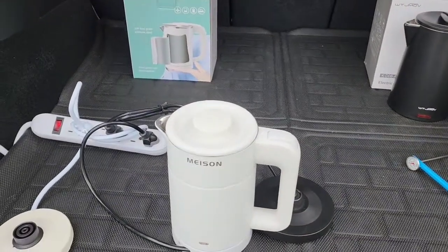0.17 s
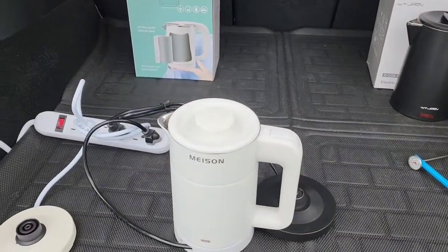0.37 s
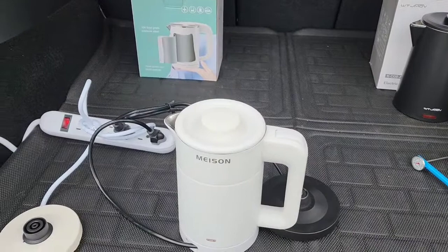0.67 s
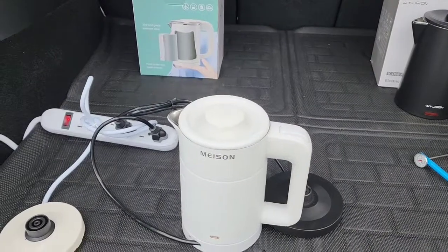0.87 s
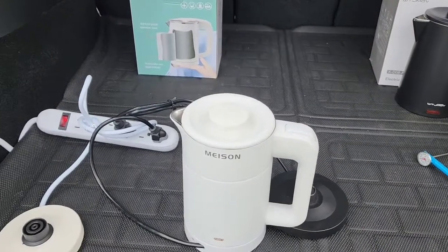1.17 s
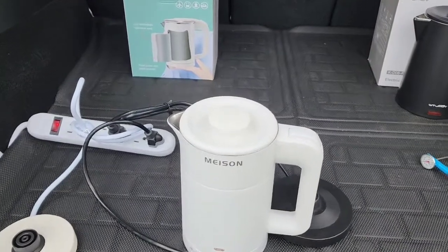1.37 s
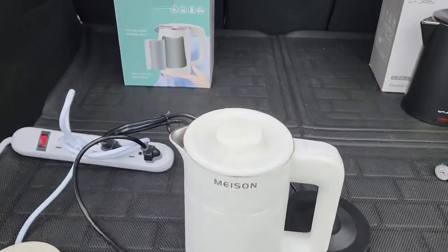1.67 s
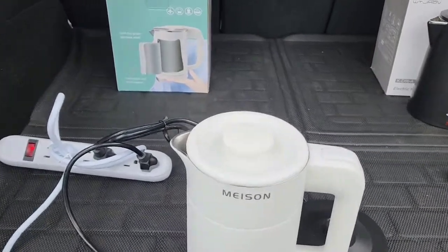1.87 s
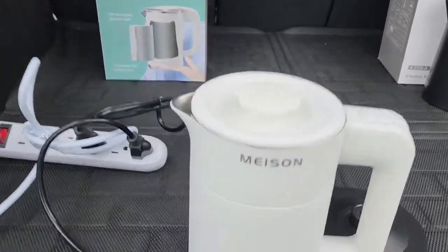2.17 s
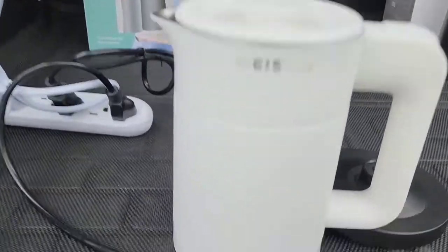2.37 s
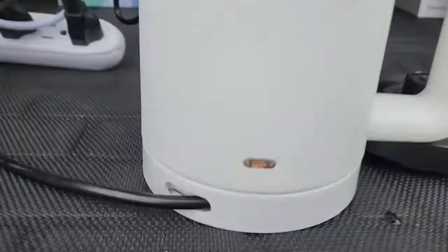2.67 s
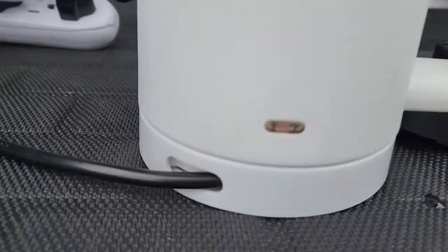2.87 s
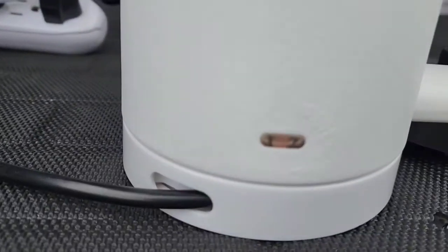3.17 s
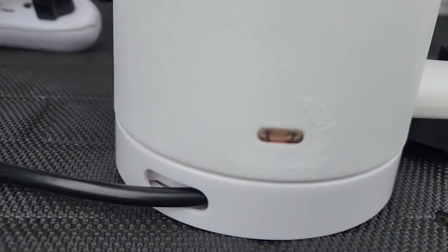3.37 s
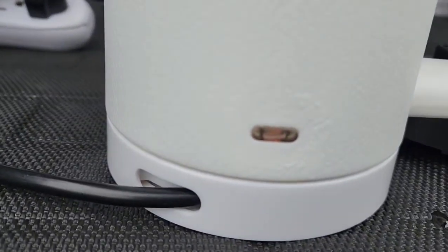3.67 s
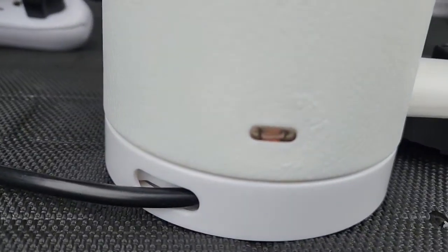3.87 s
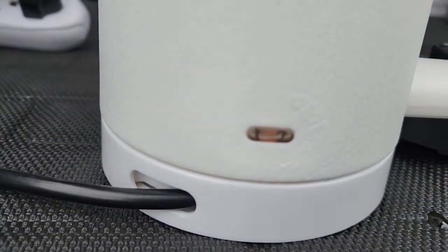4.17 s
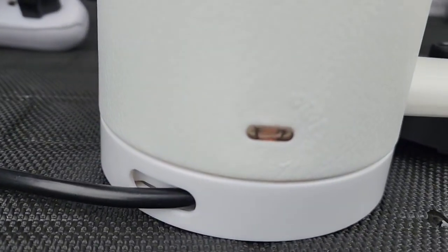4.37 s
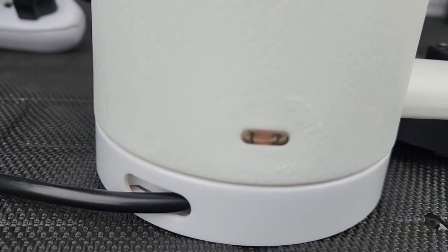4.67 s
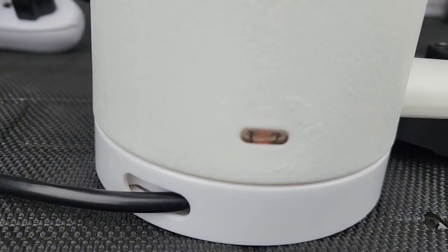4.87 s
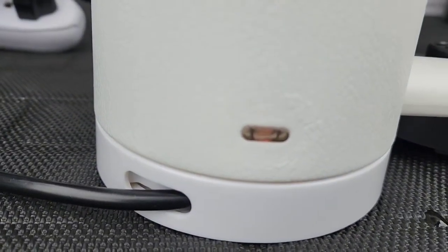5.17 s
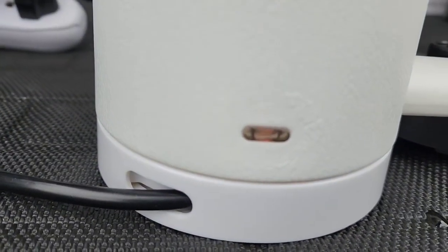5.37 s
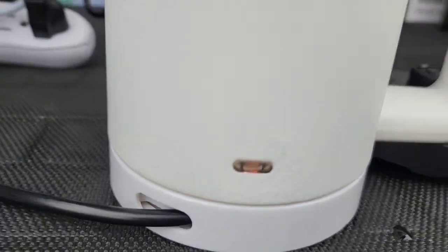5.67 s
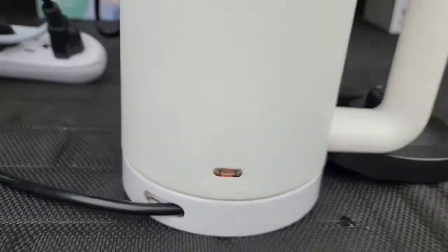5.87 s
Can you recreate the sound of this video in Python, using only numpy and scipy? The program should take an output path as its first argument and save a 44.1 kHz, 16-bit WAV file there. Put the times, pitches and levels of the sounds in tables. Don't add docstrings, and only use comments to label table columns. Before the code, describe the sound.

From the start, deep traffic and machinery boom fills an open vehicle boot, surging unevenly with soft dull thuds, under a broad outdoor wash. A far motor whines at a mid pitch with rough overlapping howls, loudest in the first half second, then biting in weaker spurts until about 2.6 s. At 0.55-0.8 s a distant brake gives one thin, fluttering, very high squeal. The kettle's simmer is faint at first. Around 2.1-2.7 s a sleeve rustles with a quick jerk and tiny crisp snaps, mainly left, as the phone moves in. From 2.7 to 5.5 s the simmer is close: a dense, low-mid bubbling roar, steady, with the yard dimmed and a faint motor whine at 3 s and from 4 to 5.3 s. Near 5.6-6 s faint cloth ticks accompany the retreat and the simmer softens. Light microphone hiss persists, stronger on the left.

```python
import sys
import numpy as np
from scipy import signal
from scipy.fft import rfft, irfft, next_fast_len
from scipy.io import wavfile
from scipy.ndimage import uniform_filter1d, map_coordinates

SR = 44100
rng = np.random.default_rng(int(sys.argv[2]) if len(sys.argv) > 2 else 0)


def boost_factor(decibels):
    exponent = np.asarray(decibels, float) / 20
    return 10 ** exponent


def transcribe(signal):
    frames = np.atleast_2d(signal).T
    limited = np.clip(frames, -1, 1)
    pcm = np.round(limited * 32767).astype(np.int16)
    wavfile.write(sys.argv[1], SR, pcm)


N = 265437

# pitch_hz, level_db (per Hz)
SIMMER_COLOUR = [(180, -17.5), (300, 1), (398, -5), (474, -6), (660, -6.5), (919, -10.5), (1080, -14),
                 (1670, -11), (2520, -28.5), (3190, -27.5), (3510, -37), (4310, -36), (4810, -56),
                 (6100, -51), (13000, -70.5)]
# pitch_hz, width_hz, gain_db
SHELL_MODES = [(700, 85, -4.5), (960, 120, 4), (1086, 110, -4.5), (2920, 69, -8), (3140, 190, 4),
               (4730, 390, -7), (6230, 460, 5), (6860, 240, -7), (7500, 260, 2), (8800, 300, -3),
               (10800, 560, -4.5), (12000, 500, 6.5)]
# pitch_hz, likeness (0-1), left_minus_right_db, left_lead_rad
SIMMER_PORTS = [(300, 0.95, -1.5, 0.5), (600, .84, -3, -0.27), (885, 0.85, -4, 1.07),
                (1150, 0.28, -10.5, -2.5), (1460, .05, -14.5, -0.5), (1900, 0.29, -18.5, -5),
                (2480, .2, -21.5, -2.5), (2800, 0.27, -19.5, -6.5), (2890, 0.4, -15.5, -9.5),
                (3500, 0.21, -11, -9), (3880, .55, -10.5, -15), (4400, .1, -10, -11.5),
                (4900, .1, 16, -11.5), (6200, .2, -2, -11), (8000, 0.35, 1, -11.5)]


def kettle():
    bubbles_per_s, level_at_1m_db = 9000, -56
    chance = bubbles_per_s / SR * boost_factor(1.5 * np.array([wobble(25), wobble(25)]))
    collapses = (rng.random((2, N)) < chance) * rng.standard_normal((2, N))
    water = unit(collapses) + 0.71 * patchy(patchy_db=3.0)
    knocks = ports(filtered(water, bumps(SHELL_MODES)), SIMMER_COLOUR, SIMMER_PORTS)
    return boost_factor(level_at_1m_db + kettle_gain_db() + 0.45 * wobble(5.7)) * knocks


# time_s, distance_m
PHONE_PATH = [
    (0, 0.6),
    (.75, 0.77),
    (1.9, 0.5),
    (2.55, 0.23),
    (2.72, 0.14),
    (3, 0.12),
    (4.3, 0.11),
    (5.5, 0.12),
    (5.75, .14),
    (6.02, .22),
]


def kettle_gain_db():
    metres, = curves(PHONE_PATH)
    return -20 * np.log10(metres)


def door_shade_db():
    full_view_m = 0.4
    return np.maximum(kettle_gain_db() + 20 * np.log10(full_view_m), 0)


# pitch_hz, level_db (per Hz)
CLOTH_COLOUR = [(2000, -26.5), (3400, 2), (4190, -3.5), (5010, -19), (5510, -16.5), (6070, -12),
                (7580, -13.5), (8450, -17), (10600, -11.5), (12600, -11.5), (15600, -17)]
# pitch_hz, likeness (0-1), left_minus_right_db, left_lead_rad
CLOTH_PORTS = [(3500, .1, -10, 0), (5000, .1, 4, 0.014), (8000, .1, 13, 0.0055), (15000, .1, 12.5, 0)]
# start_s, held_s, level_db
STROKES = [
    (2.07, .25, -75),
    (2.334, 0.016, -66),
    (2.36, 0.27, -70),
    (2.99, 0.012, -78.5),
    (5.551, 0.018, -82.5),
    (5.72, .3, -84),
]
# middle_s, peak_db, pitch_hz
FIBRE_SNAPS = [
    (2.3352, -58, 10600),
    (2.4994, -62, 10800),
    (2.5604, -62, 12600),
    (2.9997, -75, 12060),
    (5.5594, -77, 9530),
    (5.7294, -72, 11200),
    (5.8294, -76, 9600),
    (5.905, -68, 12900),
]


def sleeve():
    swell_db_per_s, fade_db_per_s = 85.5, 38.5
    jerk_s, jerk_faster = 0.05, 8
    gains = []
    for time_s, held_s, level_db in STROKES:
        faster = jerk_faster if held_s < jerk_s else 1
        gains.append(stroke(time_s, held_s, level_db, faster * swell_db_per_s, faster * fade_db_per_s))
    fibres = patchy(patchy_db=0.7) * boost_factor(0.9 * wobble(160))
    rush = np.max(gains, axis=0) * boost_factor(6.0) * ports(fibres, CLOTH_COLOUR, CLOTH_PORTS)
    snap_s, snap_width_hz, lean_db = 0.006, 900, 10
    snaps = [(s, snap_s, hz, snap_width_hz, db - 7, lean_db) for s, db, hz in FIBRE_SNAPS]
    return rush + flares(snaps, unlike=0.9)


# middle_s, pitch_hz, level_db
SQUEAL = [(.55, 8400, -78), (.562, 9000, -70), (.568, 8310, -62), (.59, 8450, -60), (.585, 8960, -68),
          (.607, 8960, -61), (.615, 8480, -69), (.62, 9720, -73), (.635, 9640, -74), (.63, 8900, -71),
          (.635, 8480, -70), (.652, 8900, -71), (.665, 8400, -66), (.665, 9680, -77), (.687, 8540, -74),
          (.692, 8900, -75), (.7, 9700, -80), (.716, 9680, -82), (.725, 8490, -81), (.735, 8880, -83),
          (.755, 8490, -84)]
# middle_s, length_s, pitch_hz, width_hz, level_db
PAD_RUB = [
    (0.546, .03, 8700, 120, -86),
    (0.638, 0.22, 8620, 700, -77),
    (0.653, .12, 9430, 280, -78),
    (0.793, .1, 8500, 400, -89),
]


def brake():
    grab_s, grab_width_hz, lean_db = 0.028, 55, 12
    grabs = [(s, grab_s, hz, grab_width_hz, db) for s, hz, db in SQUEAL]
    return flares([(*row, lean_db) for row in grabs + PAD_RUB], unlike=1.0)


# multiple, level_db, left_minus_right_db
WHINE_ORDERS = [(1, -3, -9), (2, -15.5, -15), (3, -14, -14.5), (4, -24.5, -14.5)]
# start_s, held_s, level_db
SPURTS = [
    (.1, .41, -41),
    (.96, 0.43, -47),
    (1.55, .12, -46),
    (1.75, .1, -49),
    (1.95, .33, -48.5),
    (2.95, 0.56, -54),
    (4.05, 1.3, -50),
]
# middle_s, length_s, pitch_hz, level_db
HOWLS = [(.06, .1, 610, -42), (.15, 0.1, 523, -40.5), (0.311, 0.075, 580, -37.5), (0.395, 0.13, 608, -37),
         (0.042, .19, 1397, -44), (0.147, 0.33, 1295, -45), (0.298, .5, 727, -40),
         (0.358, 0.14, 1240, -46.5), (.78, 0.15, 2030, -64), (1.1, .4, 1482, -50.5), (1.0, .3, 2044, -52),
         (1.294, .2, 615, -46), (1.599, .17, 1960, -49.5), (1.652, 0.28, 635, -44.5), (1.98, .07, 670, -43),
         (.25, .4, 502.5, -45), (2.0, .15, 591, -46.5), (1.902, 0.71, 711, -46), (2.03, .083, 450, -42),
         (2.168, .18, 1926, -52), (2.16, .24, 2115, -52), (.25, .5, 650, -45), (2.44, .1, 2224, -54)]


def motor():
    whine_hz, sag_hz_per_s, sag_ends_s = 725, 6.5, 4.2
    bite_db_per_s, idle_db = 130, -58
    shaft_hz = whine_hz - sag_hz_per_s * np.minimum(np.arange(N) / SR, sag_ends_s)
    phase = 2 * np.pi * np.cumsum(shaft_hz) / SR
    spurts = [stroke(*row, bite_db_per_s, bite_db_per_s) for row in SPURTS]
    bite = boost_factor(idle_db) + np.max(spurts, axis=0)

    howls = []
    for time_s, length_s, hz, level_db in HOWLS:
        width_hz = 70 * (hz / 1000) ** 1.3
        howls.append((time_s, length_s, hz, width_hz, level_db, along(YARD_PORTS, hz, axis=2)))
    out = flares(howls, unlike=0.55)

    for multiple, level_db, lean_db in WHINE_ORDERS:
        flicker = np.array([wobble(20), wobble(14)])
        line = np.sin(multiple * phase + 0.7 * wobble(24) + 0.4 * flicker)
        line_db = level_db + 2.4 * wobble(26) + 0.82 * flicker + port_lean(lean_db)
        out = out + bite * boost_factor(line_db) * line
    return out


# time_s, load_db
MACHINE_LOAD = [(0, 5), (.3, 4), (.5, 2.5), (.62, 0), (.75, -2), (1, 2.5), (1.15, 0.5), (1.3, 1),
                (1.45, 0.5), (1.65, 1), (1.85, -2), (2.15, 0.6), (2.4, -0.5), (2.7, 2), (4, -1.5), (5, 2),
                (5.5, -5.5), (6.02, -0.5)]


def load_db():
    return curves(MACHINE_LOAD)[0]


# pitch_hz, level_db (per Hz)
YARD_COLOUR = [(180, -40), (300, -4.5), (400, -5.5), (546, -8.5), (650, -5), (780, -8.5), (1000, -10),
               (1450, -7), (2200, -12.5), (2670, -20.5), (3600, -29), (4300, -45.5), (4700, -65.5),
               (6000, -110)]
# pitch_hz, width_hz, gain_db
FAR_RESONANCES = [(4240, 310, 3.5), (4900, 350, -4.5), (2240, 57, 3), (1130, 200, -3.5)]
# pitch_hz, likeness (0-1), left_minus_right_db, left_lead_rad
YARD_PORTS = [(300, .88, 1.5, .2), (440, 0.13, 0, 0.88), (600, 1, -0.5, 0.42), (770, 0.43, -2, 1.1),
              (960, .15, -1.5, 0.61), (1170, 0.39, -4, 2), (1470, 0.27, -11, 3.7), (1720, 0.97, -11.5, 3.6),
              (2300, 0.31, -12.5, 8.8), (2740, 0.15, -12, 8.2), (3650, .1, -8, 11), (4380, .1, -4, 17),
              (5000, .1, 5.5, 7.7), (6000, 0.09, 9, 12)]


def yard():
    wash = filtered(patchy(patchy_db=1.06), bumps(FAR_RESONANCES))
    level_db = -41 + load_db() - 0.75 * door_shade_db()
    return boost_factor(level_db + 0.24 * wobble(5.2)) * ports(wash, YARD_COLOUR, YARD_PORTS)


# pitch_hz, level_db (per Hz)
BOOM_COLOUR = [(8.8, -41), (15, -24), (43, 0.5), (70, 2.5), (108, 2), (146, -14.5), (200, -20.5),
               (260, -46.5), (440, -120)]
# pitch_hz, level_db (per Hz)
DRONE_COLOUR = [(71, -31), (120, -7), (145, -9.5), (205, -6.5), (480, -25.5), (620, -52), (1060, -120)]
# pitch_hz, likeness (0-1), left_minus_right_db, left_lead_rad
BASS_PORTS = [(40, 1, 1.5, -0.13), (100, 1, -0.3, -.1), (200, 0.85, 1.5, -0.21), (293, 1, 0.5, -0.057),
              (450, 0.52, 1, 0.43)]
# peak_s, change_db
SURGES = [(.15, 3.5), (.4, -4), (0.671, 2), (.82, -2.5), (.02, 2), (2.32, -3), (3.66, -2.5), (5.2, -1),
          (1.08, 4), (1.18, -2), (1.71, -2), (2.07, -1.5), (2.14, 5), (3.13, 2), (3.24, -2), (3.72, -4),
          (4.0, 5), (4.159, 4), (4.27, -3), (4.62, -4), (4.7, 2), (4.86, -6.5), (5.7, -3), (5.83, 1.5),
          (6.0, -3.5)]
# middle_s, pitch_hz, level_db
THUDS = [(0.181, 113, -23), (0.201, 188.6, -34), (0.449, 172.8, -24.5), (.5, 35, -26), (.6, 200, -28.5),
         (.7, 200, -27), (1.05, 189.6, -29), (1.35, 169, -30), (1.5, 139, -30), (1.741, 29.8, -29.5),
         (1.8, 192.4, -27.5), (2.299, 35, -27), (2.79, 45, -29), (4.681, 57.5, -25.5), (5.701, 74, -27)]


def rumble():
    shade_db, t = door_shade_db(), np.arange(N) / SR
    surge_s = 0.04
    surge_db = sum(db * np.exp(-((t - s) / surge_s) ** 2) for s, db in SURGES)
    boom_db = -24 - 0.13 * shade_db + surge_db
    drone_db = -31.5 + 0.52 * load_db() - 0.34 * shade_db
    boom = boost_factor(boom_db) * ports(patchy(patchy_db=-0.5), BOOM_COLOUR, BASS_PORTS)
    drone = boost_factor(drone_db) * ports(patchy(patchy_db=0.06), DRONE_COLOUR, BASS_PORTS)

    shortest_s, cycles, sharpness = 0.03885, 2.55, 3.5
    thuds = [(s, shortest_s + cycles / hz, hz, hz / sharpness, db, 0) for s, hz, db in THUDS]
    return boom + drone + flares(thuds, unlike=0.087)


# pitch_hz, level_db (per Hz)
HISS_COLOUR = [(2710, -29.5), (4600, 0), (5200, -5), (6000, 2), (6950, -5), (7500, -3.5), (8530, -20.5),
               (8930, -10.5), (9780, -14), (11300, -7.5), (15600, -11)]
# pitch_hz, likeness (0-1), left_minus_right_db, left_lead_rad
HISS_PORTS = [(5000, .05, 11.5, 0.01), (7000, .05, 10, 0.0012), (9000, .05, 12.5, 0.0044),
              (15000, .05, 9.5, 0.0073)]


def self_noise():
    low_hz, top_hz = 7300, 12600
    hiss = ports(patchy(patchy_db=2.3), HISS_COLOUR, HISS_PORTS)
    band = lambda hz: (hz > low_hz) * np.clip((top_hz - hz) / 2000 + 0.5, 0, 1)
    duck = 0.93 * stroke(0.56, 0.165, 0, swell=1500, fade=1000)
    return boost_factor(-81.5) * (hiss - duck * filtered(hiss, band))


def flares(events, unlike):
    out = np.zeros((2, N + SR))
    knots = rng.standard_normal((len(events), 3, 2, 400))
    for (s, length_s, hz, width_hz, db, lean_db), draw in zip(events, knots):
        t = np.arange(int(1.5 * length_s * SR)) / SR
        drive = np.array([[np.interp(t * width_hz, np.arange(400), part) for part in row] for row in draw])
        drive = drive[0] + unlike * drive[1:]
        tone = drive[:, 0] * np.cos(2 * np.pi * hz * t) + drive[:, 1] * np.sin(2 * np.pi * hz * t)
        start = SR // 2 + round(s * SR) - len(t) // 2
        out[:, start:start + len(t)] += boost_factor(db + port_lean(lean_db)) * np.hanning(len(t)) * unit(tone)
    return out[:, SR // 2:][:, :N]


def stroke(s, held, db, swell, fade):
    t = np.arange(N) / SR - s
    return boost_factor(db - swell * np.maximum(-t, 0) - fade * np.maximum(t - held, 0))


def ports(pair, spectrum, sharing):
    turn = lambda hz: np.arccos(np.clip(along(sharing, hz), -1, 1)) / 2
    colour = lambda hz: boost_factor(along(spectrum, hz)) * [np.cos(turn(hz)), np.sin(turn(hz))]
    mid, side = filtered(pair, colour)
    ratio = lambda hz: boost_factor(2 * along(sharing, hz, axis=2))
    lead = lambda hz: np.exp(0.5j * np.outer([1, -1], along(sharing, hz, axis=3)))
    balance = lambda hz: np.sqrt([ratio(hz), 1 + 0 * hz] / (1 + ratio(hz))) * lead(hz)
    out = filtered(np.array([mid + side, mid - side]), balance)
    return out / np.std(out.mean(axis=0))


def port_lean(lean_db):
    return lean_db / 2 * np.array([[1], [-1]])


def patchy(patchy_db):
    z = signal.stft(rng.standard_normal((2, N)), nperseg=512)[2]
    field = uniform_filter1d(rng.standard_normal(z.shape[1:]), size=5, axis=0)
    field = uniform_filter1d(field, size=14, axis=1)
    return signal.istft(z * boost_factor(patchy_db * unit(field)), nperseg=512)[1][:, :N]


def bumps(peaks):
    return lambda hz: boost_factor(sum(db * np.exp(-((hz - c) / w) ** 2) for c, w, db in peaks))


def filtered(x, response):
    m = next_fast_len(N + 8192)
    return irfft(rfft(x, m) * response(np.fft.rfftfreq(m, 1 / SR)), m)[..., :N]


def along(points, hz, axis=1):
    table = np.transpose(points)
    return np.interp(np.log(hz + 1), np.log(table[0] + 1), table[axis])


def curves(rows):
    s, *cols = np.transpose(rows)
    return [np.interp(np.arange(N) / SR, s, c) for c in cols]


def wobble(rate):
    return map_coordinates(rng.standard_normal(int(N * rate / SR) + 4), [np.arange(N) * rate / SR])


def unit(x):
    return x / np.sqrt(np.mean(x ** 2) + 1e-20)


def scene():
    return kettle() + sleeve() + brake() + motor() + yard() + rumble()


def low_pass(x):
    return signal.sosfilt(signal.butter(12, 15710, fs=SR, output="sos"), x)


def record(dry):
    from_edge = np.minimum(np.arange(N), np.arange(N)[::-1])
    edges = np.minimum(from_edge / (0.003 * SR), 1)
    return low_pass((dry + self_noise()) * edges)


dry = scene()
out = record(dry)
transcribe(out)
```